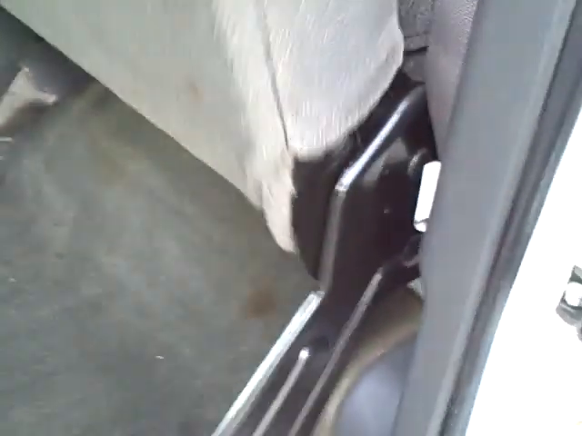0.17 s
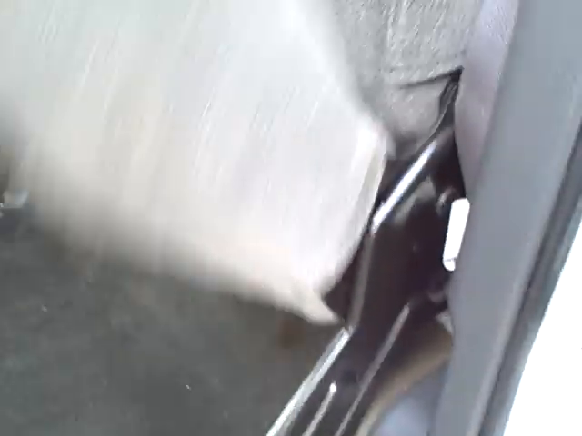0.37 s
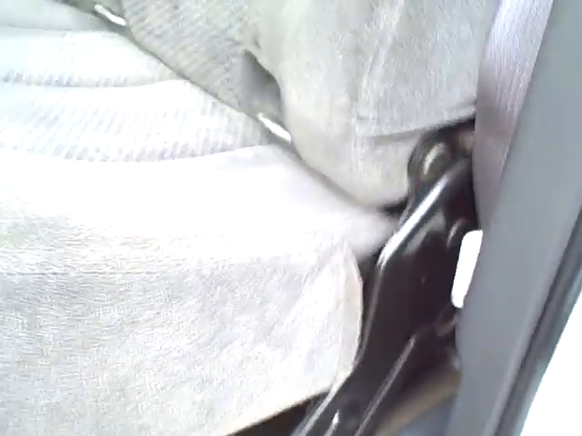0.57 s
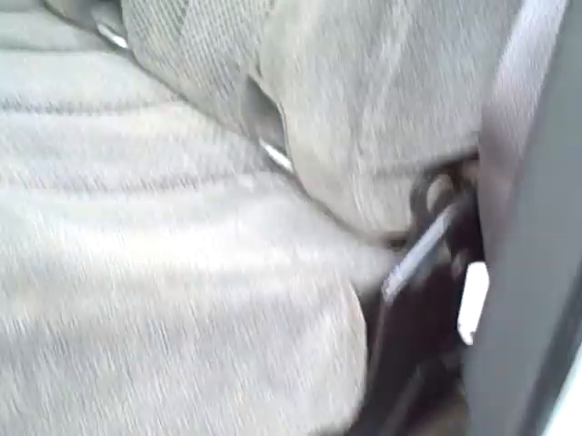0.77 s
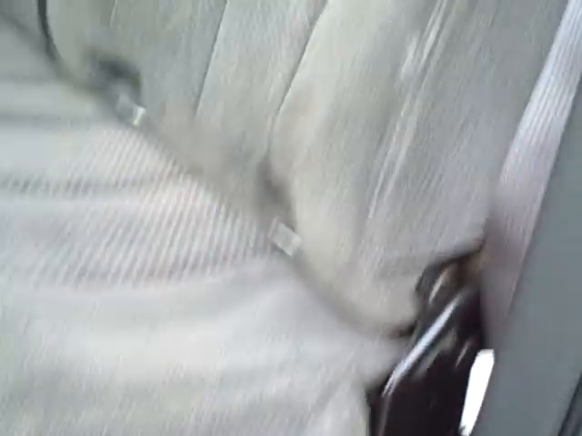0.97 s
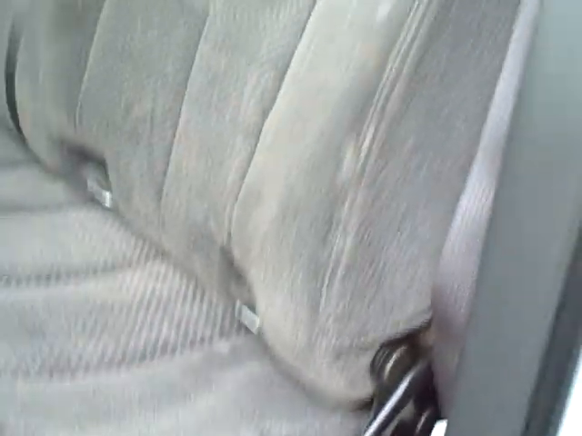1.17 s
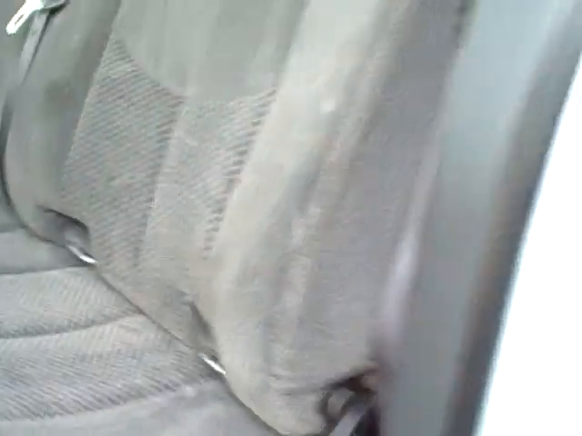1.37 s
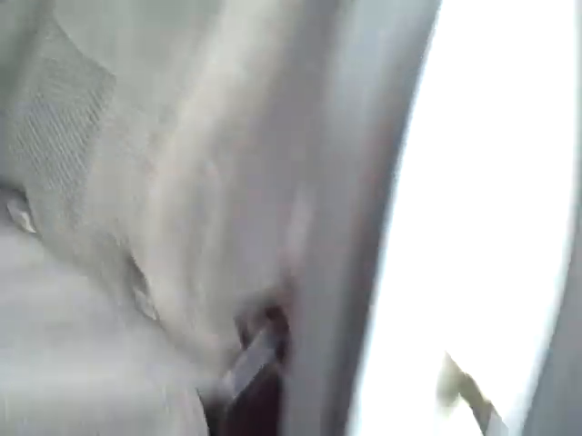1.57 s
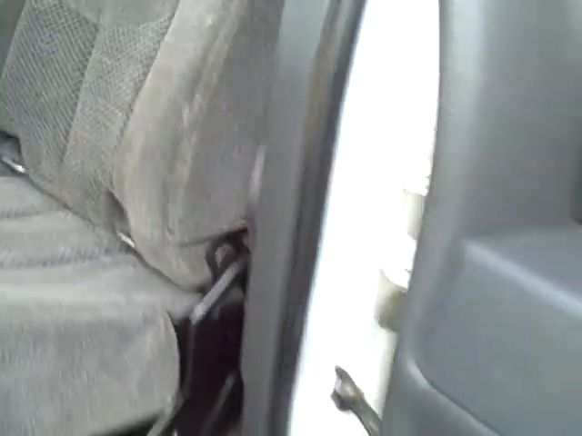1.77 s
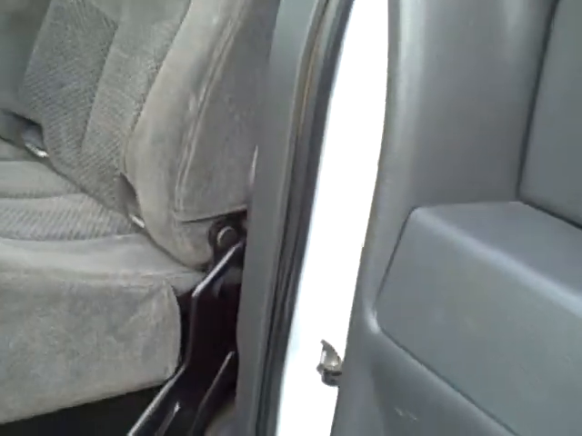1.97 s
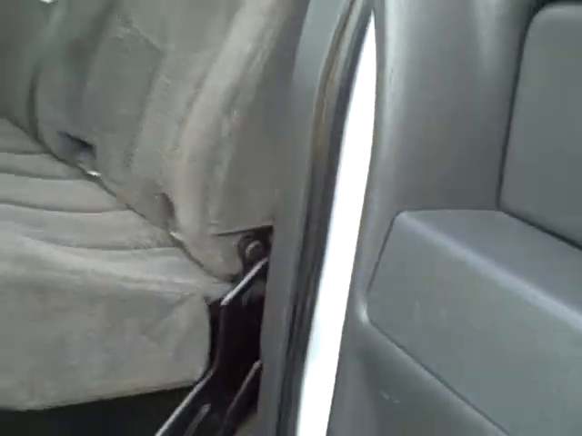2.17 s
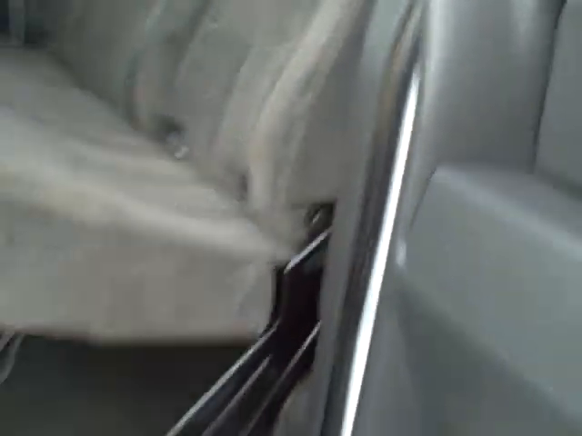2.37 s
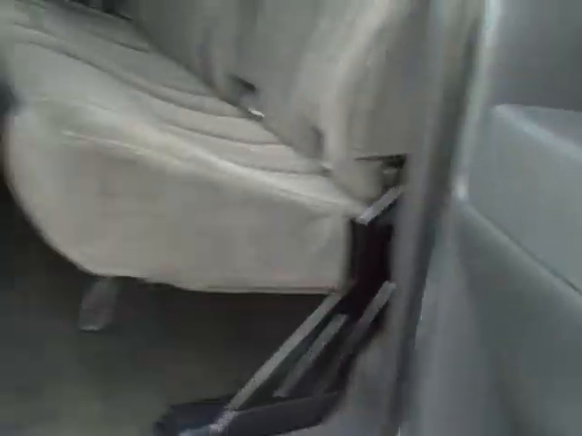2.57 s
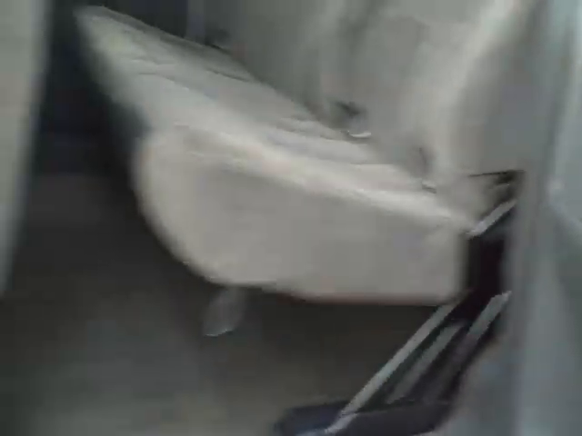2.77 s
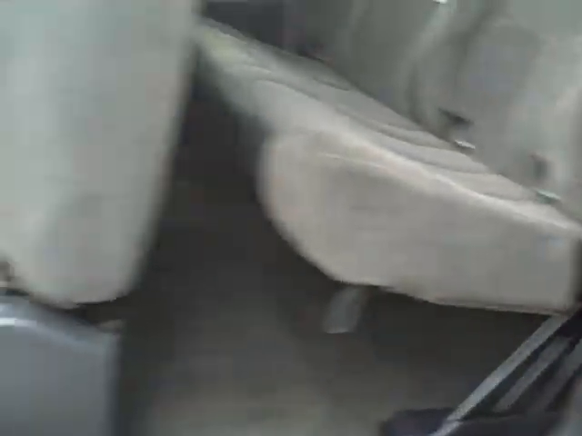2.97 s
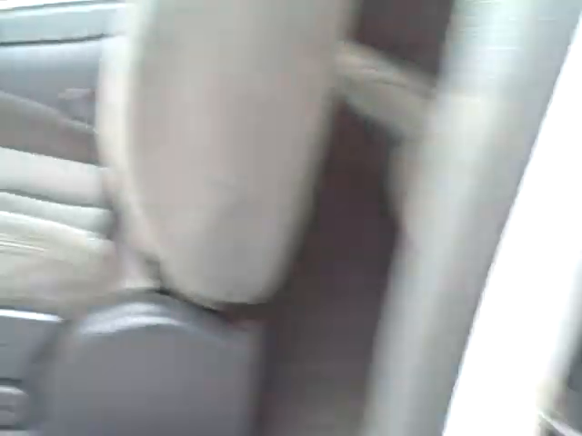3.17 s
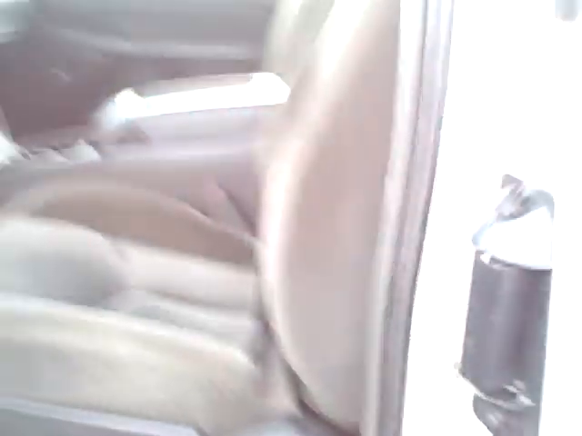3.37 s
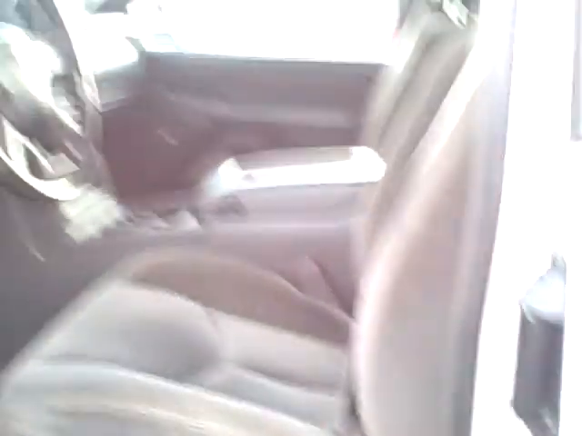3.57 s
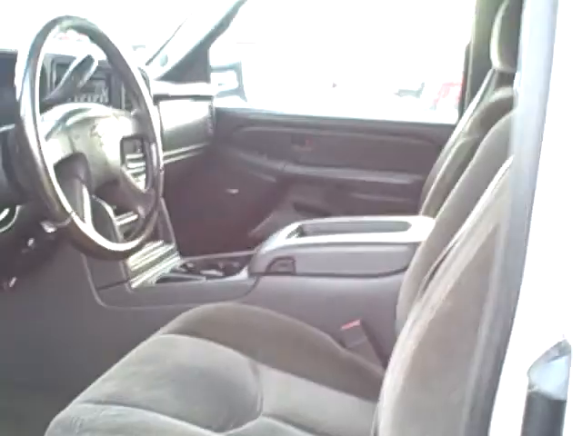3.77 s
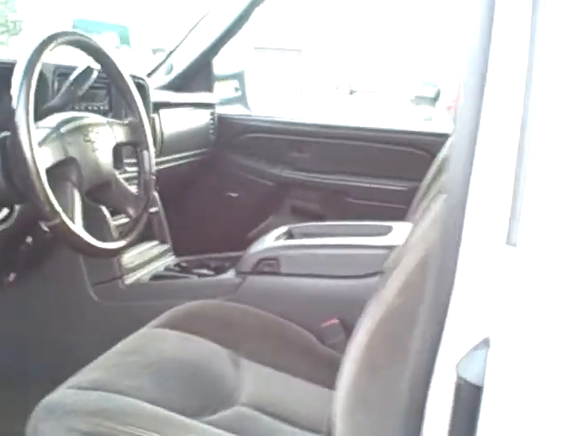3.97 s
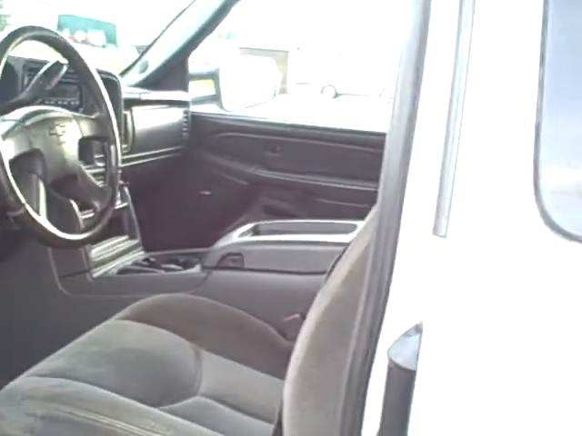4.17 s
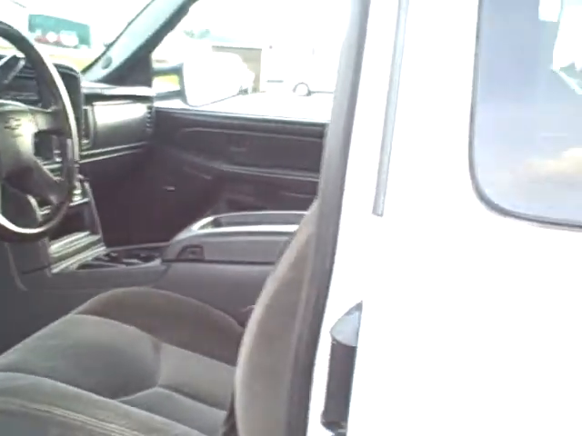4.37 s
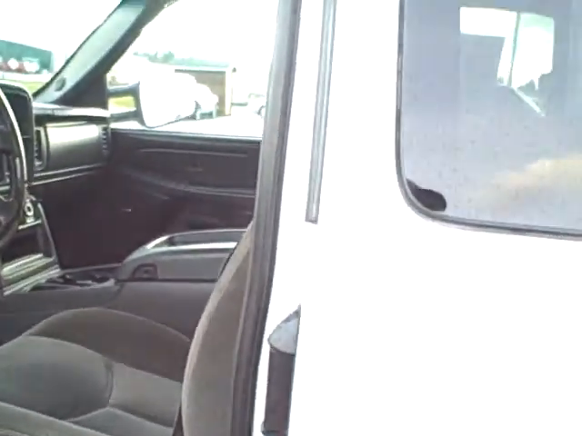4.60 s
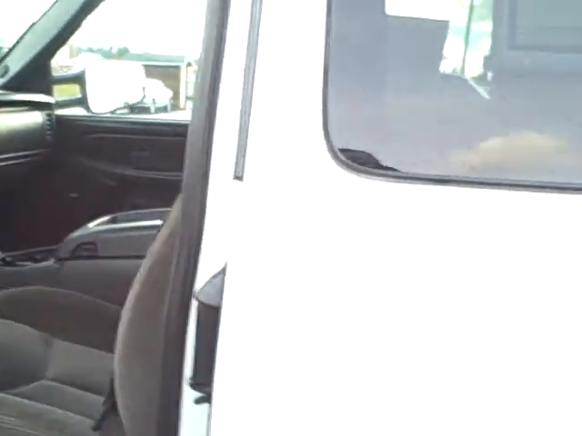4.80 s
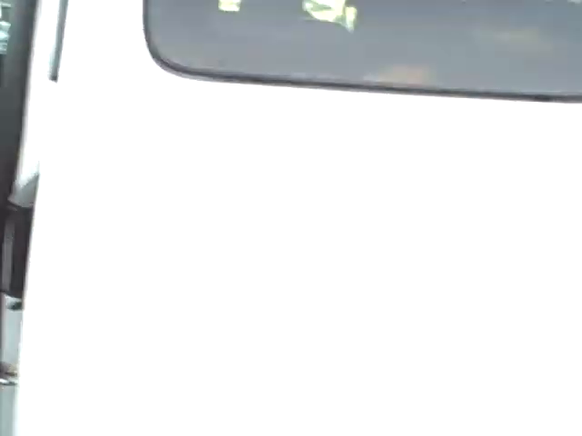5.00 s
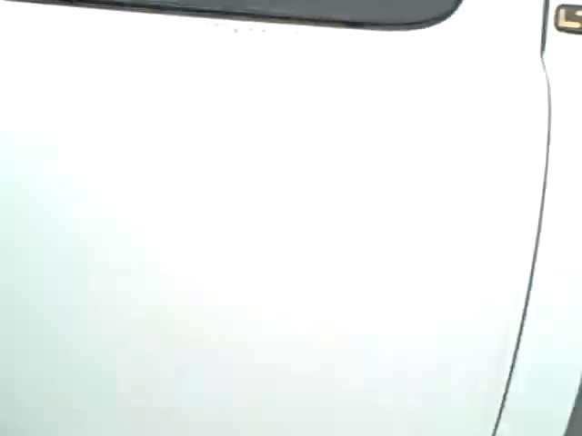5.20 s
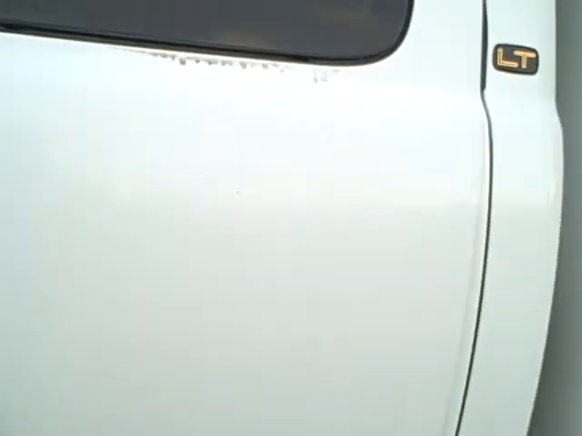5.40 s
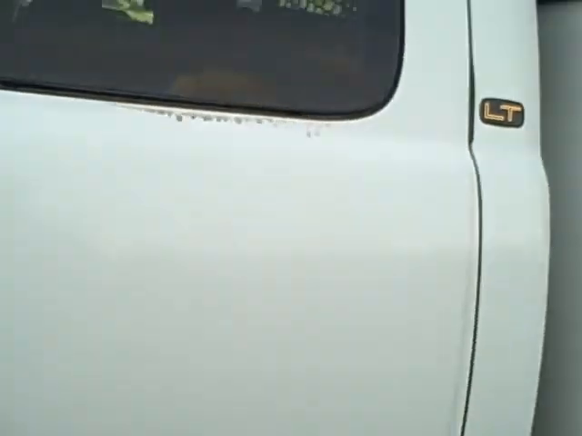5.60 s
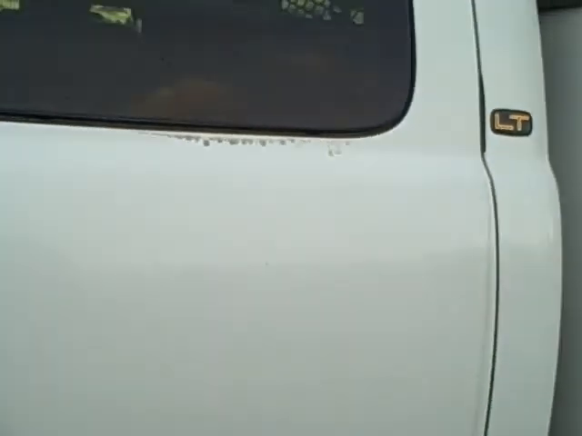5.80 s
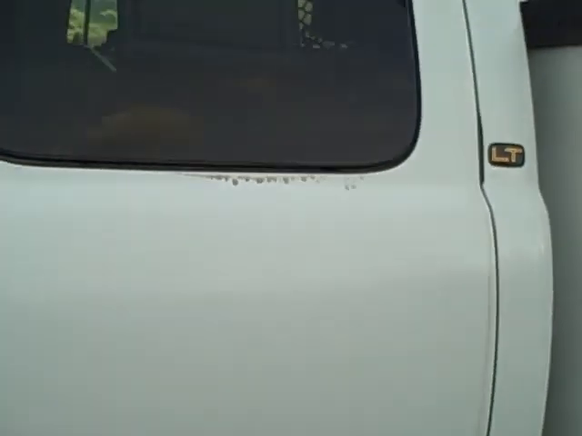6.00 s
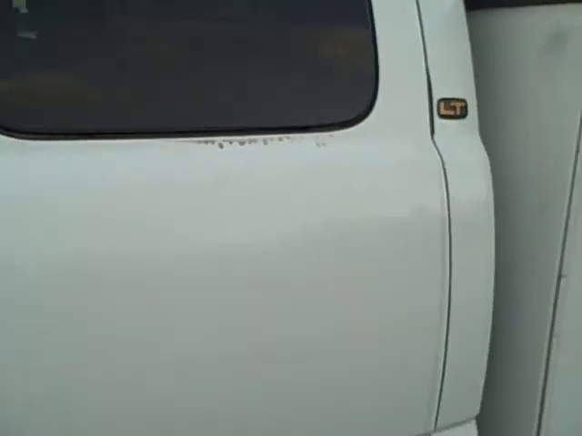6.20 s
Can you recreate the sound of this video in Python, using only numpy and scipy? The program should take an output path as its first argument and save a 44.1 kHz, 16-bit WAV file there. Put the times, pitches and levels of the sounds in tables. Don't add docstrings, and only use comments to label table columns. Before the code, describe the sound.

Close, mono, slightly overloaded handheld sound of a parked truck. The rear seat grates on its hinge and bangs down with small padded bounces. Fabric swishes and brushes, a buckle and plastic trim tick softly. Then one heavy door slam, latch clatter and low air thump, followed by small knocks, soft hand bumps and a tiny rubber creak, then a second, tighter slam. Distant road rumble continues underneath.

```python
import sys
import numpy as np
from scipy import signal
from scipy.fft import rfft, irfft
from scipy.io import wavfile
from scipy.ndimage import uniform_filter1d

SR = 44100
rng = np.random.default_rng(int(sys.argv[2]) if len(sys.argv) > 2 else 0)


def int16_out(signal):
    q = np.round(np.clip(np.atleast_2d(signal).T, -1, 1) * 32767)
    wavfile.write(sys.argv[1], SR, q.astype(np.int16))


def makeup_ratio(level_db):
    decades = np.asarray(level_db, float) / 20
    return 10 ** decades


N = 275533

# hz, level_db
BUCKLE = [(991, 0.5), (1500, -0.5), (700, -5), (2360, -6), (2720, -8.5), (3150, -10), (4180, -13),
          (4510, -10)]
SEAT_CATCH = [(1310, -4.5), (2600, 0), (3070, -1), (3590, -1), (4950, -5), (5780, -1), (6410, -3),
              (7750, -8)]
TRIM_CLIP = [(400, -2.5), (1870, -2), (2420, -3), (3520, 3), (3900, 3), (4650, 3), (6320, -5), (7180, -4)]
PAWL = [(1300, 0), (1480, -3), (1000, -3)]
STRIKER = [(2900, 0), (3150, -2), (8100, -6)]
DOOR_SKIN = [(560, 0), (750, -1), (980, -3), (1250, -7)]
CATCH = [(2180, -2), (2500, 0), (2750, -4)]


def colour(points, count):
    hz, db = np.transpose(points)
    axis = np.log(np.arange(count // 2 + 1) * SR / count + 1)
    gain = makeup_ratio(np.interp(axis, np.log(hz), db, -90, -90))
    x = irfft(rfft(rng.standard_normal(count)) * gain, count)
    return x / np.std(x)


def walk(rate, count):
    k = max(int(SR / rate), 1)
    held = np.repeat(rng.standard_normal(count // k + 1), k)
    x = uniform_filter1d(held, k)[:count]
    return x / np.std(x)


def fade(t, t60, rise):
    t = np.maximum(t, 0)
    return (1 - np.exp(-t / rise)) * np.exp(-np.log(1000) * t / max(t60, .01))


def ring(x, hz, t60):
    pole = np.exp(2j * np.pi * hz / SR - np.log(1000) / (t60 * SR))
    return signal.lfilter([1], [1, -pole], x).imag


def add(out, x, s):
    i = int(s * SR)
    out[i:i + len(x)] += x[:len(out) - i]


def swells(rows, rest_db):
    s, db, rise, fall = np.transpose(rows)[:, :, None]
    t = np.arange(0, N + 64, 64) / SR
    away = np.abs(t - s) / np.maximum(np.where(t < s, rise, fall), .003)
    power = np.sum(makeup_ratio(db - 20 * away ** 1.2) ** 2, axis=0) + makeup_ratio(rest_db) ** 2
    return np.interp(np.arange(N) / SR, t, np.sqrt(power))


def slam(contacts, metal, modes, grit_db, treble_loss, spring, wash_db, wash_t60, hard_ms, soften, settle):
    # hz, level_db
    panel_wash = [(40, -9.5), (90, -0.5), (180, 6), (400, -5), (800, -15.5), (1600, -25)]
    start, count = contacts[0][0], SR
    t = np.arange(count) / SR + start
    rows = np.array(contacts)
    contact_ms = hard_ms * makeup_ratio(-soften * np.maximum(rows[:, 1], -40))
    rows = np.column_stack([rows, contact_ms])

    noise, out = rfft(colour(metal, count)), np.zeros(count)
    chatter = walk(900, count)
    cracks = [1.201 * fade(t - r[0], 0.019, 0.0009 * max(r[5], .3)) for r in rows]
    octave = np.log2(np.arange(len(noise)) + 1)
    for hz in 250 * 2 ** np.arange(7):
        window = np.cos(np.pi / 2 * np.clip(octave - np.log2(hz), -1, 1)) ** 2
        band = irfft(noise * window, count)
        grit = makeup_ratio(grit_db * (.6 * chatter + 0.75 * walk(500, count)))
        for (s, db, t60, tilt_db, _, ms), crack in zip(rows, cracks):
            shake = fade(t - s, t60 * (hz / 2000) ** -treble_loss, 0.0016 * max(ms, .3))
            out += band * grit * makeup_ratio(db + tilt_db * np.log2(hz / 2000)) * (shake + crack)

    wash_gain = sum(makeup_ratio(r[4] + wash_db) * fade(t - r[0], wash_t60, 0.0064) for r in rows)
    out += colour(panel_wash, count) * wash_gain

    size = (len(rows), len(modes))
    share = rng.uniform(0.48, 1, size) * rng.choice([-1, 1], size)
    for k, (hz, db, t60) in enumerate(modes):
        force = np.zeros(count)
        for (s, rattle_db, _, tilt_db, thump_db, ms), part in zip(rows, share[:, k]):
            if hz > 1000:
                hit = part * makeup_ratio(rattle_db + tilt_db * np.log2(hz / 2000))
                add(force, np.array([hit]), s - start)
            else:
                width = max(ms, .3) * SR / 1000 * (1 + spring / hz) * (1 + settle * (s - start))
                push = np.hanning(int(width) + 3)
                add(force, part * makeup_ratio(thump_db) * push / push.sum(), s - start)
        out += makeup_ratio(db) * ring(force, hz, t60)

    track = np.zeros(N)
    add(track, out, start)
    return track


def bench_drop():
    # start_s, rattle_db, rattle_t60_s, tilt_db_per_octave, thump_db
    contacts = [(.577, -4, 0.034, .5, -19), (.584, -23, 0.091, -3.5, -5), (.594, -41, 0.1, 10, -11),
                (.603, -42.5, 0.06, 0, -22), (.619, -64, .089, 12, -12), (0.629, -45.5, 0.12, 6, -33.5),
                (.649, -40, 0.083, 9.5, -43), (.67, -40.5, 0.092, 8.5, -12),
                (0.768, -45.5, 0.071, 10, -37.5), (.774, -43, 0.063, 10, -30)]
    # hz, level_db
    metal = [(180, -39.5), (300, -6), (1030, -21.5), (1280, -9.5), (2930, -13), (5160, -24), (5700, -21.5),
             (8090, -32.5), (13800, -33), (16000, -45)]
    # hz, level_db, t60_s
    modes = [(30.54, -5.5, 0.63), (62.74, -10.5, 0.26), (91.1, -9, 0.38), (122.5, -6.5, 0.23),
             (171, 3, 0.075), (197, 7, 0.054), (354.4, -8.5, 0.1697), (436, -25, 0.14), (1310, -6, .05),
             (750.3, -16, .1), (1800, -5, 0.045), (2980, -4, 0.03)]
    return slam(contacts, metal, modes, grit_db=2.5, treble_loss=0.16, spring=59.9, wash_db=-20.0,
                wash_t60=0.27, hard_ms=1.1, soften=.2, settle=14)


def rear_door():
    # start_s, rattle_db, rattle_t60_s, tilt_db_per_octave, thump_db
    contacts = [(3.518, -38, .045, -7, -36), (3.522, -11.5, 0.032, 0.3, -26), (3.527, -7, 0.052, -0.1, -15),
                (3.533, -8.5, 0.092, 2.5, -15), (3.540, -24.5, 0.074, -5, -16),
                (3.549, -12.5, 0.056, 2.5, -16.5), (3.557, -24.5, .17, 4, -6.5),
                (3.568, -13.5, .072, 2, -9.5), (3.576, -16, .054, -3, -9.5), (3.584, -35, .12, 2.5, -7),
                (3.603, -40.5, 0.19, 3.5, -18.5), (3.622, -41, 0.045, 0, -20), (3.663, -50, 0.21, 3.5, -46)]
    # hz, level_db
    metal = [(180, -43.5), (300, -2), (667, -5.5), (762, 0.5), (994, -8), (1170, -4.5), (5600, -18),
             (8090, -15), (12900, -16), (16000, -29)]
    # hz, level_db, t60_s
    panels = [(24.19, -6, 0.7), (38, -13.5, .55), (62.9, -14.5, 0.4), (98.8, -9, 0.35), (155.5, -7.5, 0.29),
              (178, -5, 0.11), (349, -3, .2), (419, -4, 0.13), (494, -8, .15), (583, -6.5, .15),
              (644, -3, .11), (746, -3.5, 0.09), (910, -1.5, 0.096)]
    # hz, level_db, t60_s
    latch = [(1135, -3, .05), (1743, -10.5, .06), (1973, -8, 0.051), (3002, -5, 0.026), (6750, -16, 0.028),
             (4650, -9, 0.015), (8140, -2, 0.016), (13000, -11, .015)]
    return slam(contacts, metal, panels + latch, grit_db=1.5, treble_loss=0.33, spring=38, wash_db=-24.0,
                wash_t60=0.35, hard_ms=1.5, soften=.12, settle=2.7)


def front_door():
    # start_s, rattle_db, rattle_t60_s, tilt_db_per_octave, thump_db
    contacts = [(5.566, -30, 0.055, -2.1, -30), (5.572, -13, 0.026, 3.5, -22),
                (5.576, -19, 0.055, -2.5, -18), (5.588, -14.5, 0.092, 1.1, -15.5),
                (5.594, -46, .15, 1, -9.5), (5.603, -35, 0.11, 2, -18), (5.620, -29.5, .075, -0.7, -15),
                (5.63, -20, 0.094, -2, -8), (5.644, -45, .1, 1, -17), (5.662, -42.5, .16, 2.5, -30),
                (5.690, -37.5, 0.082, 3, -22), (5.741, -59, .24, 3, -25.5), (5.79, -58, .16, 3.5, -33.5)]
    # hz, level_db
    metal = [(180, -46), (300, -2.5), (747, 1), (1170, -3.5), (1470, -5), (2200, -0.5), (3010, -3.5),
             (4550, -6.5), (6240, -11.5), (15800, -6)]
    # hz, level_db, t60_s
    panels = [(28.3, -13.5, 0.42), (50.3, -13.5, 0.3), (80, -12.5, 0.29), (111, -10.5, 0.17),
              (141, -4.5, 0.11), (175, -2, 0.065), (259, -13.5, 0.1), (354, -4, 0.14), (431.5, -4, 0.13),
              (509, 0.5, 0.097), (603, -13.5, 0.14), (729, -9, 0.057), (890, -9.5, 0.135)]
    # hz, level_db, t60_s
    latch = [(2146, -2.5, 0.043), (2583, -2.5, 0.038), (3500, -14, 0.047)]
    return slam(contacts, metal, panels + latch, grit_db=2.5, treble_loss=0.31, spring=55, wash_db=-21,
                wash_t60=0.27, hard_ms=1.3, soften=0.094, settle=2.5)


def strike(hits):
    out, t = np.zeros(N), np.arange(SR // 4) / SR
    for s, db, t60, modes in hits:
        for (hz, mode_db), (turn, share) in zip(modes, rng.random((len(modes), 2))):
            shape = fade(t, t60 * (hz / 1000) ** -0.34, .0005)
            add(out, makeup_ratio(db + mode_db - 3.7 * share) * shape * np.sin(2 * np.pi * (hz * t + turn)), s)
    return out


def struck_parts():
    # start_s, peak_db, t60_s at 1 kHz, modes
    latch_hits = [(3.535, -9, .04, PAWL), (3.550, -8, .04, PAWL), (3.5655, -10, .03, STRIKER),
                  (5.594, -15, .03, DOOR_SKIN), (5.681, -35, .05, DOOR_SKIN), (5.5755, -13, .04, CATCH),
                  (5.588, -15, .045, CATCH)]
    # start_s, peak_db, t60_s at 1 kHz, modes
    small_hits = [(2.362, -39.5, .09, BUCKLE), (2.368, -48, .07, BUCKLE), (.769, -45.5, .1, SEAT_CATCH),
                  (.775, -43, 0.091, SEAT_CATCH), (2.853, -52, .1, TRIM_CLIP), (2.861, -57, .1, TRIM_CLIP)]
    return strike(small_hits + latch_hits)


def bench_hinge():
    # time_s, level_db
    scrape_level = [(.40, -70), (.416, -51), (.45, -53), (.485, -53), (.50, -54), (.54, -50), (.575, -49)]
    # start_s, peak_db
    clear_slips = [(.389, -50), (.408, -52), (.417, -44), (.425, -43), (.431, -46), (.439, -43),
                   (.449, -45), (.456, -43), (.464, -41), (.473, -39), (.482, -43), (.493, -44),
                   (.500, -45), (.506, -45)]
    # hz, level_db
    seat_frame = [(380, -5), (560, -1), (720, 0), (900, -3), (1150, -8), (1600, -13)]
    s, db = np.transpose(scrape_level)
    cycle = np.cumsum(120 * (1 + .15 * walk(60, N)) / SR) % 1
    slips = rng.standard_normal(N) * (np.exp(-cycle / .05) + .03) * makeup_ratio(4 * walk(90, N))
    frame = .7 * ring(slips, 400, .02) + 1.7 * ring(slips, 640, 0.022)
    frame += 1.5 * ring(slips, 900, 0.014) + .3 * ring(slips, 1500, .012)
    scrape = frame / np.std(frame) * makeup_ratio(np.interp(np.arange(N) / SR, s, db, -150, -150))
    return scrape + strike([(at, peak_db + 4, .03, seat_frame) for at, peak_db in clear_slips])


def hinge_squeak():
    # time_s, pitch_hz, level_db
    squeak = [(4.84, 4300, -90), (4.86, 4400, -78), (4.905, 4400, -74), (4.93, 4490, -86),
              (5.03, 4700, -85), (5.07, 4500, -87), (5.16, 4460, -82), (5.18, 4460, -92)]
    t = np.arange(N) / SR
    s, hz, db = np.transpose(squeak)
    pitch = np.interp(t, s, hz) * (1 + .03 * walk(900, N))
    tone = np.sin(2 * np.pi * np.cumsum(pitch) / SR)
    return tone * makeup_ratio(np.interp(t, s, db, -150, -150) + 4.9 * walk(60, N))


def seal_creak():
    # time_s, slips_per_s, level_db
    creak = [(4.53, 90, -78), (4.555, 110, -68), (4.58, 125, -65), (4.61, 155, -72), (4.645, 190, -70),
             (4.68, 220, -67), (4.72, 240, -72), (4.735, 240, -85)]
    # hz, level_db, t60_s
    creak_modes = [(2550, -4, .03), (5300, -5, .006), (6520, -2, .014), (7400, -4, .01), (10800, -2, .006),
                   (13600, 1, .004), (15100, -4, .004)]
    s, rate, db = np.transpose(creak)
    t = np.arange(SR // 3) / SR + s[0]
    turns = np.cumsum(np.interp(t, s, rate) * (1 + .04 * walk(120, len(t)))) / SR
    slips = np.diff(np.floor(turns), prepend=0) * makeup_ratio(np.interp(t, s, db, -150, -150))
    out = np.zeros(N)
    for hz, mode_db, t60 in creak_modes:
        uneven = slips * makeup_ratio(3 * rng.standard_normal(len(t)))
        add(out, makeup_ratio(mode_db + 7) * ring(uneven, hz, t60), s[0])
    return out


def lock_rod():
    # peak_s, level_db, rise_s and fall_s per 20 dB
    shiver = [(3.74, -75, 0.2, 0.1), (3.78, -77, 0.2, -0.1)]
    rod = ring(rng.standard_normal(N), 3690, .05)
    return rod / np.std(rod) * swells(shiver, -130)


def cloth():
    # fastest_s, hiss_db, swish_db, rise_s and fall_s per 20 dB
    strokes = [(0.0, -53, -46, 1, -0.1), (.27, -61, -66, 1, 0), (.478, -51, -48, 0, -0.24),
               (.56, -45.5, -51, 0.2, 0.29), (1.018, -54, -76, 0.6, 0.5), (1.426, -41.5, -64, 0.19, 0.62),
               (1.56, -50.5, -58.5, 0, 0.3), (1.77, -54, -59.5, .5, 0.23), (1.98, -58, -62, 0.3, 0.2),
               (2.77, -67, -65, 0.8, 0.4), (3.085, -57, -60, 0.13, -0.2), (3.21, -48.5, -55.5, 0.06, 0.52),
               (3.36, -44, -58.5, 0.15, 0.24), (3.47, -50.5, -60, 0.22, 0.03), (4.58, -68, -58, 0, 0.2),
               (4.685, -67, -58, 0.1, 0.2), (5.245, -49.5, -57, 0.11, .05), (5.28, -58, -62, 0, .025),
               (5.15, -61, -59, .15, .2), (5.38, -64, -62, .1, .3), (5.55, -57.5, -53, 0.2, 0.34),
               (5.72, -53, -54, 0.4, 0.46), (6.0, -63, -62, 0.5, 0.2)]
    # start_s, level_db
    snaps = [(.112, -56), (.197, -60), (.218, -58), (.251, -52), (.27, -53), (.293, -53), (.326, -54),
             (2.71, -62), (3.007, -59), (4.895, -64), (4.73, -63), (5.054, -63)]
    # peak_s, level_db, rise_s and fall_s per 20 dB
    creases = [(.56, -49, 0.28, 0.28), (1.15, -61, 0.15, 0.3), (1.35, -59.5, 0.24, 0.2),
               (1.99, -56, .8, 0.5), (3.22, -57.5, 0.43, 0.8)]
    # hz, level_db
    hiss_colour = [(880, -48), (1500, -7.5), (1760, -13), (3880, -5.5), (7000, -6.5), (12500, -1),
                   (15300, -1.5), (16000, -11)]
    swish_colour = [(200, -13), (400, 2.5), (650, 0), (1000, -3), (1800, -11.5), (3500, -24.5)]
    rustle_colour = [(700, -20), (1300, -0.5), (1800, -2.0), (3000, -7.5), (5000, -21.0)]
    hiss = colour(hiss_colour, N) * makeup_ratio(0.54 * walk(440, N) + 0.39 * walk(25, N))
    swish = colour(swish_colour, N) * makeup_ratio(0.55 * walk(30, N))
    rustle = colour(rustle_colour, N) * makeup_ratio(1.1 * walk(60, N))

    s, hiss_db, swish_db, rise, fall = np.transpose(strokes)
    speed = swells(np.transpose([s, hiss_db, rise, fall]), -85)
    speed = np.hypot(speed, swells([(*row, .005, .014) for row in snaps], -120))
    sweep = swells(np.transpose([s, swish_db, rise, fall]), -66)
    crease = np.hypot(swells(creases, -76), makeup_ratio(-15) * speed)
    return makeup_ratio(-2.0) * hiss * speed + makeup_ratio(-2.5) * swish * sweep + makeup_ratio(-3.0) * rustle * crease


def ticks():
    # start_s, peak_db, centre_hz, t60_s
    knocks = [(.043, -45, 774, 0.044), (.369, -53, 890, 0.046), (.513, -39, 650, 0.037),
              (.533, -43, 920, .032), (2.216, -48.5, 707, 0.077), (2.363, -42, 807, 0.058),
              (3.927, -51, 1585, 0.08), (4.047, -47, 1780, 0.083), (6.209, -60, 2500, .049),
              (5.058, -56, 800, .16)]
    # start_s, peak_db, centre_hz, t60_s
    clicks = [(.27, -54, 4050, .064), (1.128, -55.5, 3500, .057), (2.362, -44.5, 2740, 0.057),
              (2.515, -58, 5010, 0.071), (3.059, -57, 5840, 0.15), (3.803, -55, 2460, 0.085),
              (3.826, -52, 2296, 0.12), (3.845, -55.5, 4010, .1), (3.902, -54, 2005, 0.073),
              (3.986, -57.5, 1940, 0.072), (4.003, -42.5, 1904, .094), (4.019, -49, 1468, .16),
              (4.035, -52, 1500, 0.13), (4.575, -72, 2600, .2), (4.64, -75, 6500, .3),
              (4.675, -68, 3500, 0.2)]
    # start_s, peak_db, centre_hz, t60_s
    pats = [(1.385, -43.5, 1420, 0.1), (1.41, -42.5, 1395, 0.087), (2.853, -47, 4470, 0.075),
            (2.861, -50, 2470, .1)]
    # start_s, peak_db, centre_hz, t60_s
    pings = [(2.362, -50, 4200, 0.064), (2.363, -47.5, 1516, 0.079), (2.514, -44, 685, .087),
             (4.005, -45.5, 4000, 0.077), (5.314, -46.5, 2050, 0.038), (5.323, -44, 1800, 0.065)]
    kinds = [(knocks, 7, 8.6), (clicks, 3, 5.5), (pats, .45, 3.9), (pings, 16.5, 28)]
    out, count = np.zeros(N), SR // 4
    t = np.arange(count) / SR
    for rows, below_db, above_db in kinds:
        for s, db, hz, t60 in rows:
            u = t[:int(t60 * SR)]
            octaves = rng.uniform(-2.5, min(2.5, np.log2(15000 / hz)), 48)
            ratio = 2 ** octaves[:, None]
            gain = makeup_ratio(np.where(octaves < 0, below_db, -above_db) * octaves)
            modes = np.sin(2 * np.pi * (hz * ratio * u + rng.random((48, 1))))
            modes *= np.exp(-np.log(1000) * 0.32 * ratio * u / t60)
            shape = [(hz / 16, -4 * below_db), (hz, 0), (hz * 16, -4 * above_db)]
            chatter = colour(shape, count) * makeup_ratio(2.5 * walk(599, count))
            burst = .8 * gain @ modes / np.sqrt(np.sum(gain ** 2)) + 0.52 * chatter[:len(u)]
            add(out, makeup_ratio(db + 5) * burst * fade(u, t60, 0.00031), s)
    return out


def handling():
    # peak_s, peak_db, pitch_hz, t60_s
    bumps = [(2.244, -40, 70.3, 0.11), (2.729, -47, 275, 0.15), (4.229, -32, 51.2, 0.1),
             (4.319, -39, 51, 0.11), (4.399, -31.5, 72.9, 0.11), (6.129, -38, 62.17, 0.12)]
    out, t = np.zeros(N), np.arange(SR // 4) / SR
    for s, db, hz, t60 in bumps:
        add(out, makeup_ratio(db + 7.0) * np.sin(2 * np.pi * hz * t) * fade(t, t60, .008), s - .01)
    return out


def yard():
    # peak_s, level_db, rise_s and fall_s per 20 dB
    rocking = [(0.0, -48, .1, 0.1), (2.45, -51.5, -0.14, 0.2), (3.45, -42, 0.16, 0.44),
               (3.75, -44, 0.1, .5), (4.36, -49, 1, 0), (5.9, -48, 0.9, 1)]
    # hz, level_db
    road_colour = [(12, -35.5), (20, -1), (107, 1), (216, -11), (434, -16), (527, -14), (607, -19),
                   (825, -18.5), (2750, -34.5), (6720, -38.5), (14700, -39.5), (16000, -40)]
    heave_colour = [(18, -26.5), (27, -14), (30, 4), (33, -14), (50, -33)]
    rumble_colour = [(40, -12), (60, 1), (90, 0), (160, 0), (220, -10), (330, -21.5)]
    heave = colour(heave_colour, N) * swells(rocking, -66.5)
    rumble = colour(rumble_colour, N)
    t = np.arange(N) / SR - .93
    heave += makeup_ratio(-34.5) * fade(t, 3.8, 0.049) * np.sin(2 * np.pi * 30.3 * t)
    road, traffic = colour(road_colour, N), walk(4, N)
    out = makeup_ratio(-53.5 + 0.38 * traffic) * road + makeup_ratio(-4) * heave
    return out + makeup_ratio(-59 + 1.5 * traffic) * rumble


def scene():
    out = bench_drop() + rear_door() + front_door() + struck_parts()
    out += bench_hinge() + hinge_squeak() + seal_creak() + lock_rod()
    out += cloth() + ticks() + handling() + yard()
    return out[None]


def band_limit(x):
    return signal.sosfilt(signal.butter(12, 16960, fs=SR, output="sos"), x)


def record(dry):
    overload = 0.71
    x = dry / (1 + np.abs(dry / overload) ** 6) ** (1 / 6)
    x = signal.sosfilt(signal.cheby2(8, 40, 17000, fs=SR, output="sos"), x)
    x = signal.sosfilt(signal.butter(1, 10, "high", fs=SR, output="sos"), x)
    return band_limit(x)


dry = scene()
out = record(dry)
int16_out(out)
```